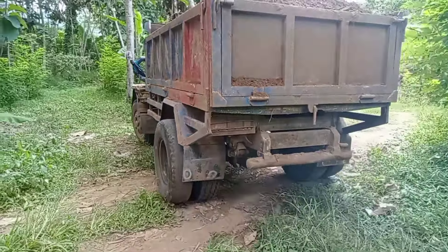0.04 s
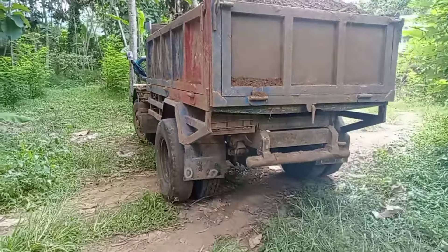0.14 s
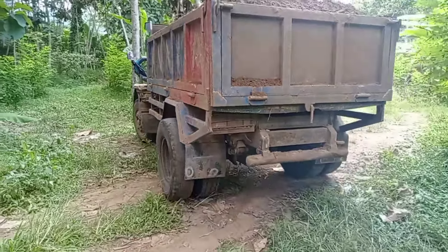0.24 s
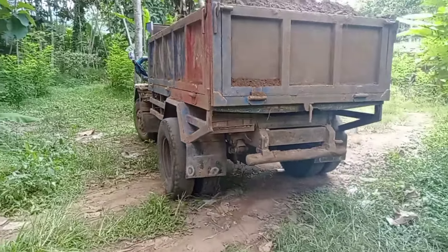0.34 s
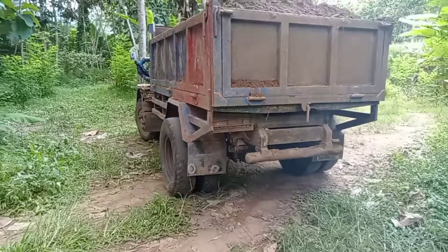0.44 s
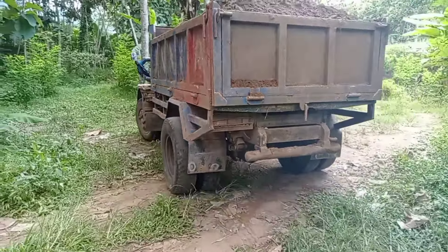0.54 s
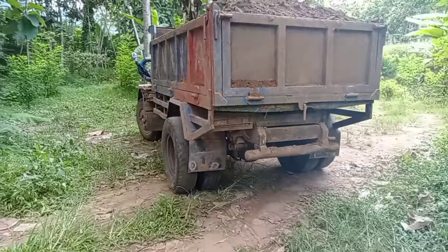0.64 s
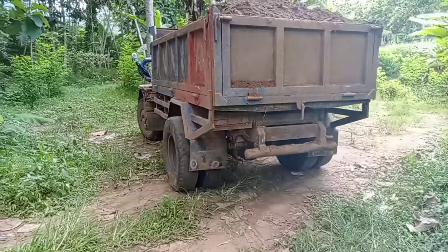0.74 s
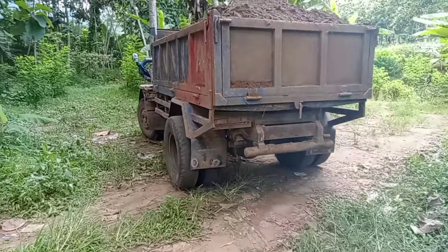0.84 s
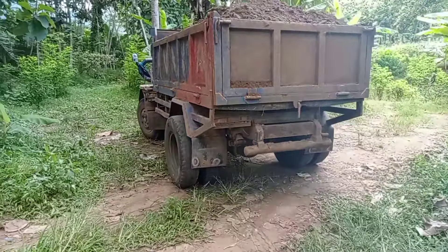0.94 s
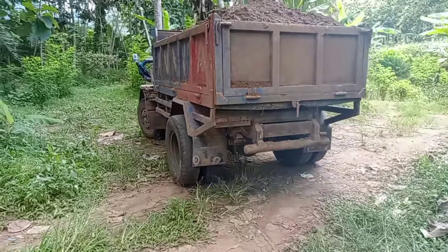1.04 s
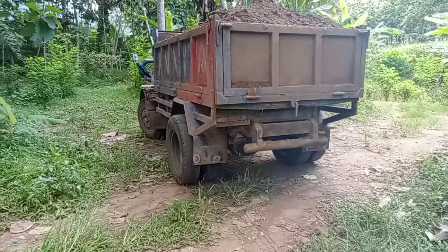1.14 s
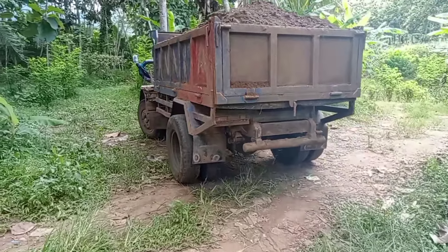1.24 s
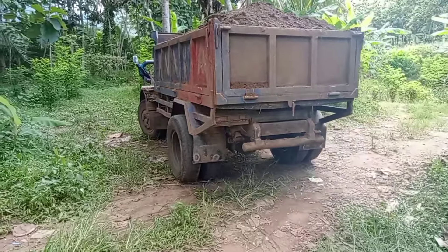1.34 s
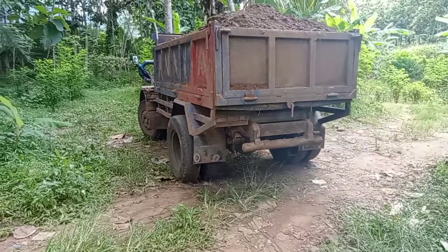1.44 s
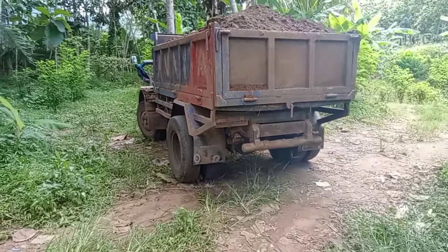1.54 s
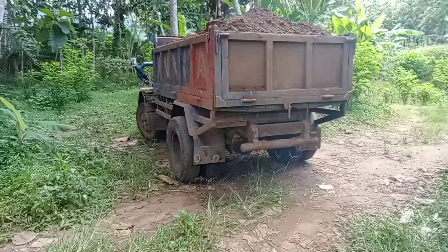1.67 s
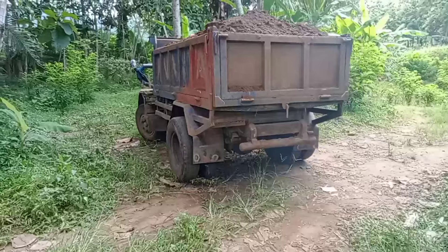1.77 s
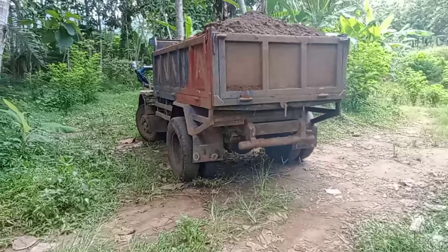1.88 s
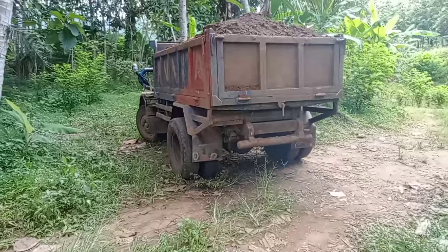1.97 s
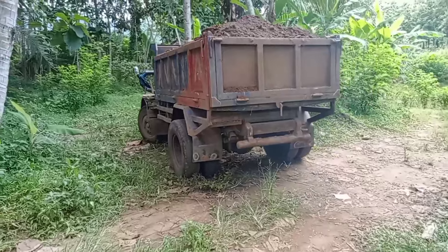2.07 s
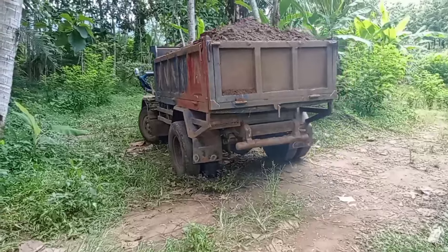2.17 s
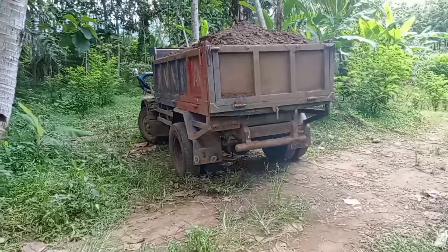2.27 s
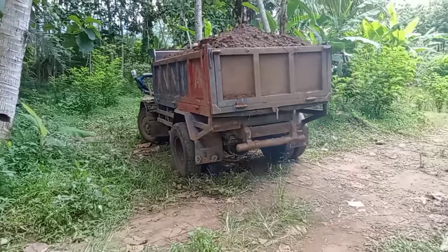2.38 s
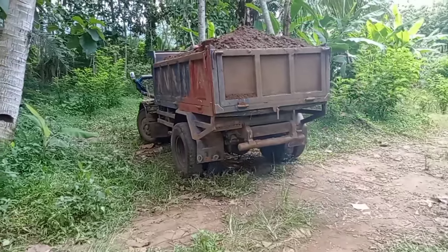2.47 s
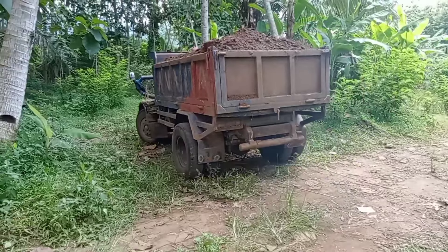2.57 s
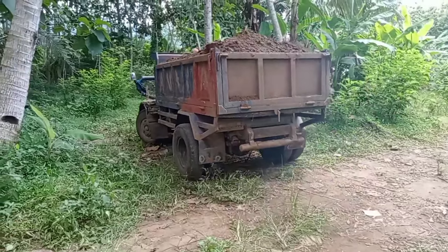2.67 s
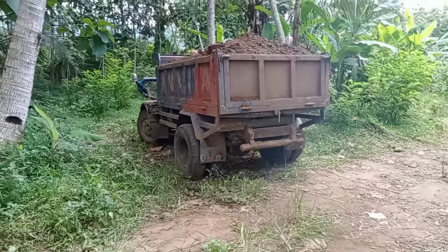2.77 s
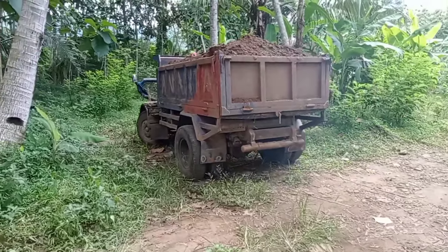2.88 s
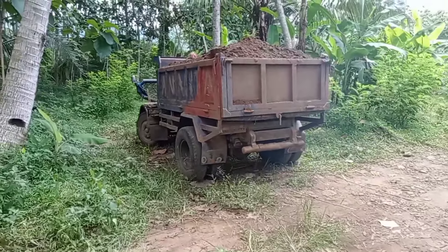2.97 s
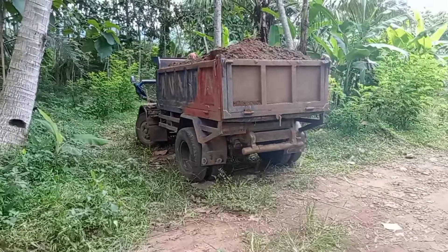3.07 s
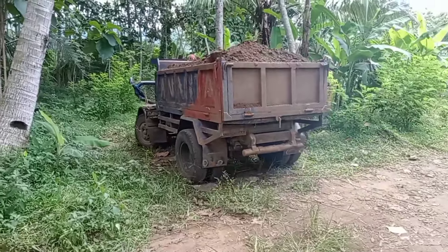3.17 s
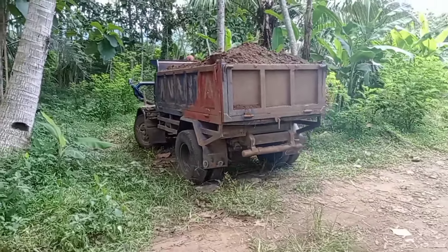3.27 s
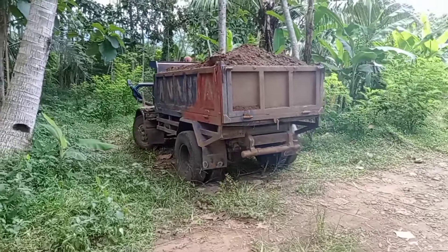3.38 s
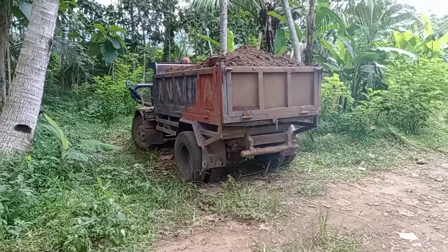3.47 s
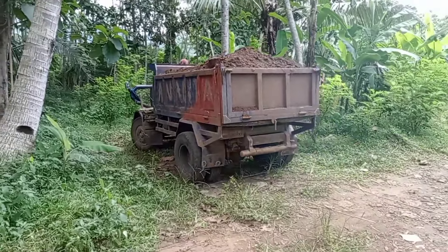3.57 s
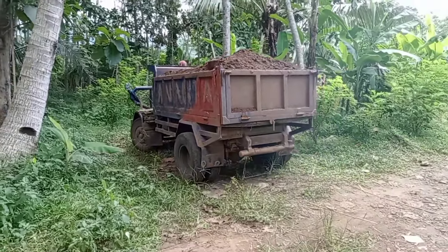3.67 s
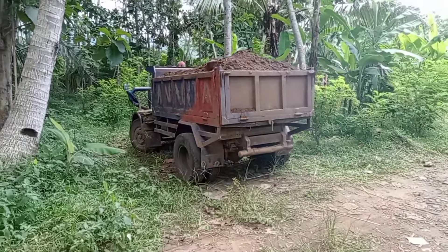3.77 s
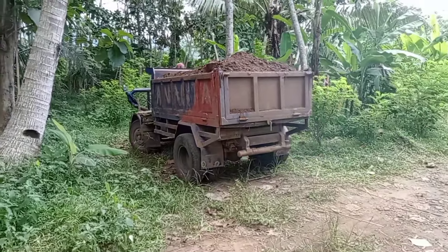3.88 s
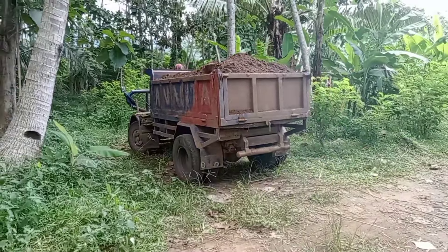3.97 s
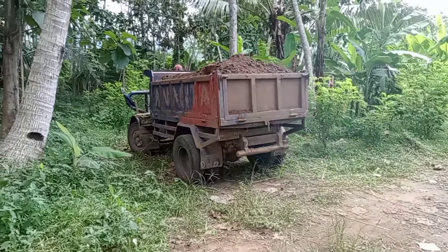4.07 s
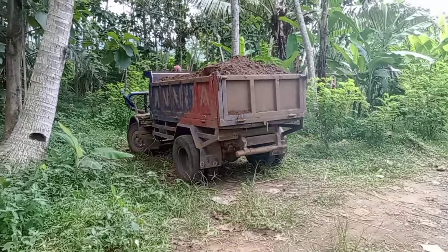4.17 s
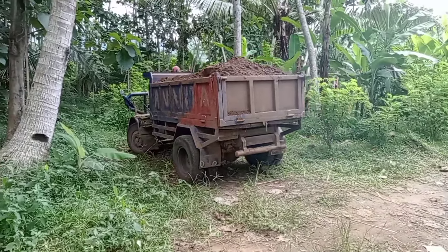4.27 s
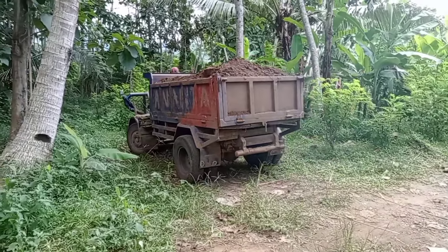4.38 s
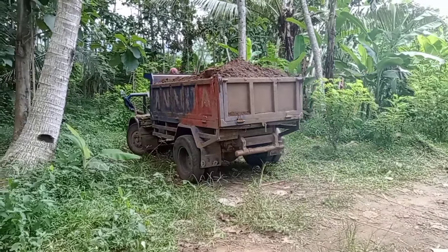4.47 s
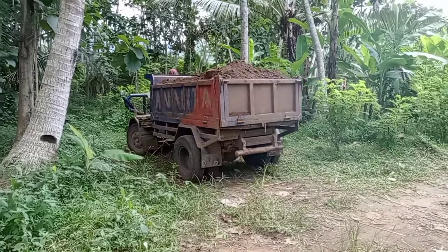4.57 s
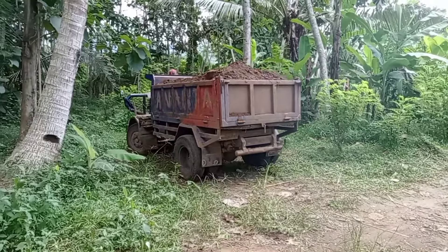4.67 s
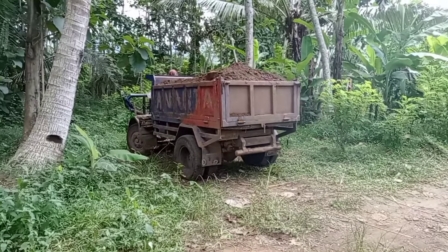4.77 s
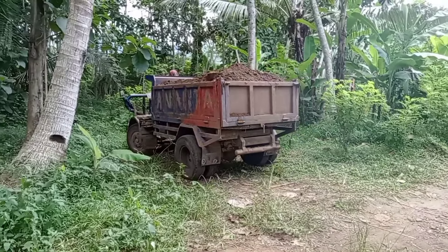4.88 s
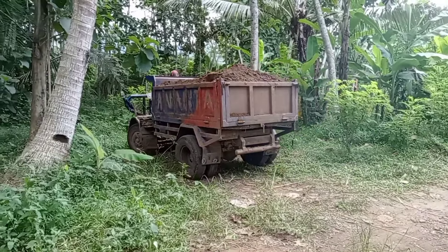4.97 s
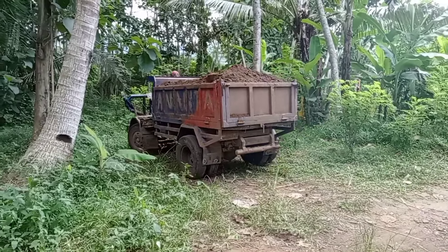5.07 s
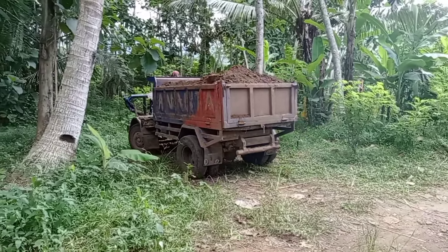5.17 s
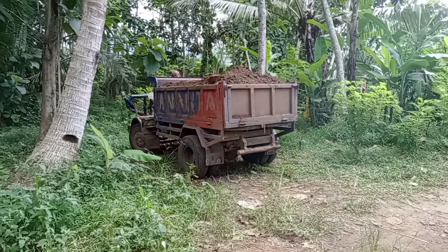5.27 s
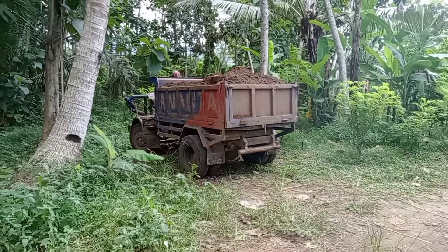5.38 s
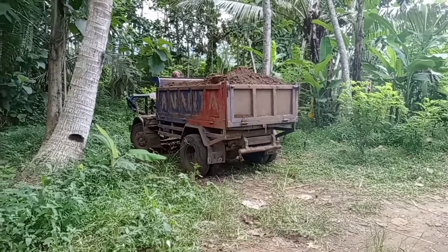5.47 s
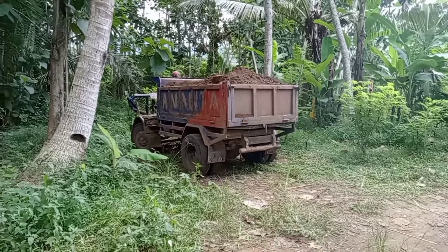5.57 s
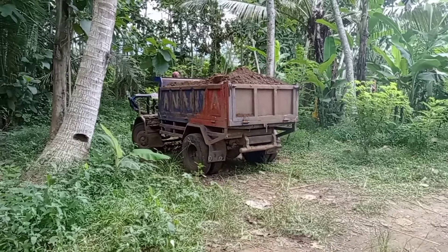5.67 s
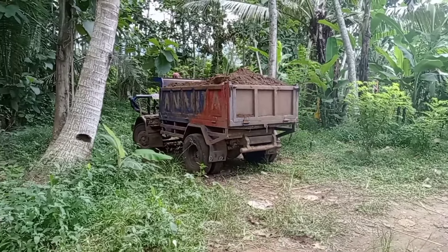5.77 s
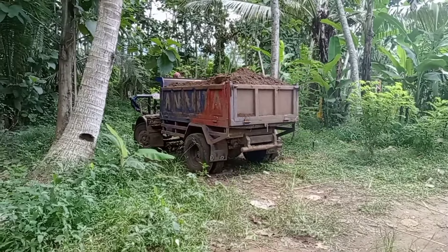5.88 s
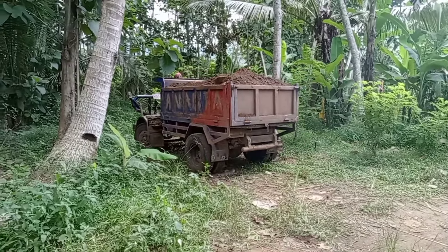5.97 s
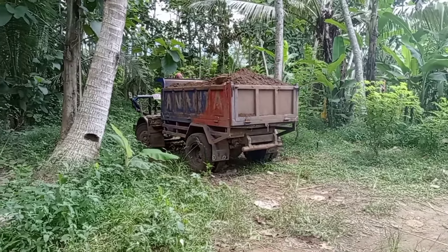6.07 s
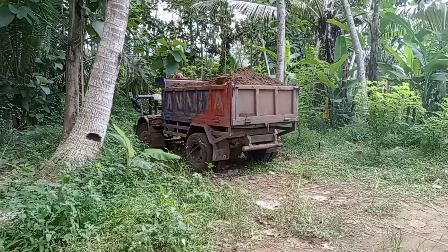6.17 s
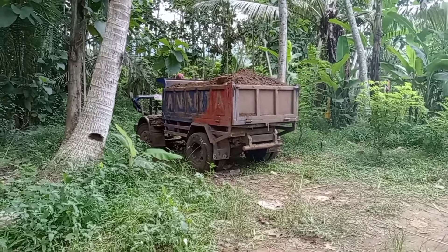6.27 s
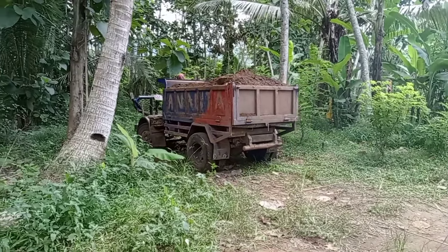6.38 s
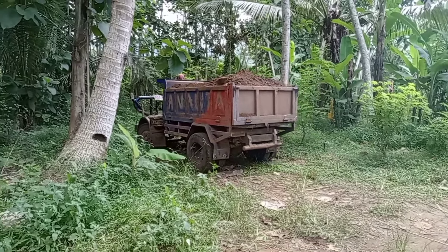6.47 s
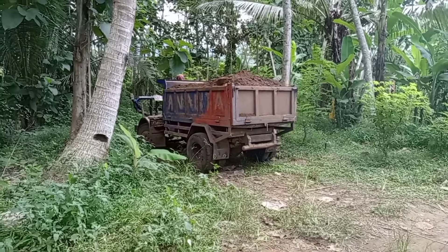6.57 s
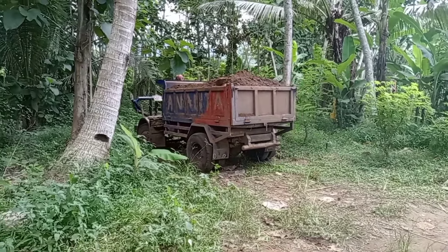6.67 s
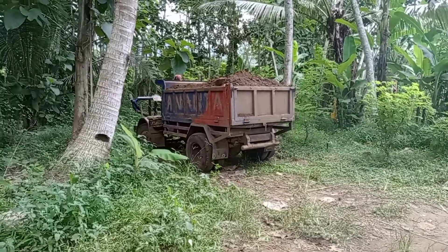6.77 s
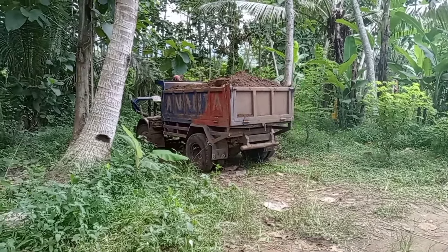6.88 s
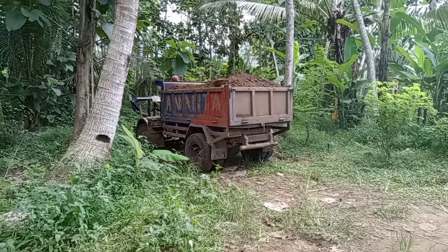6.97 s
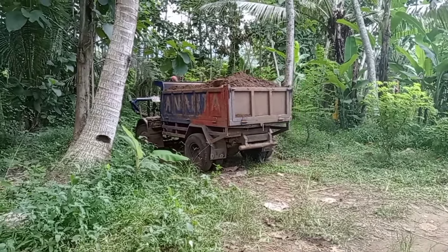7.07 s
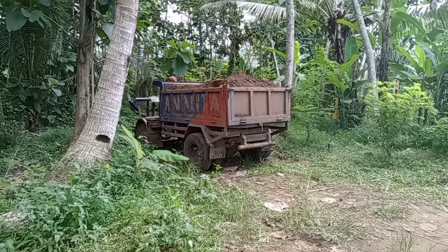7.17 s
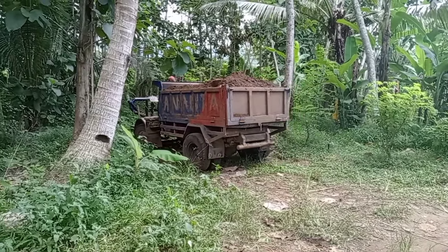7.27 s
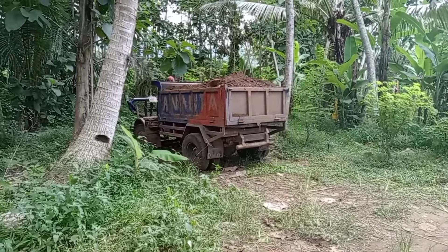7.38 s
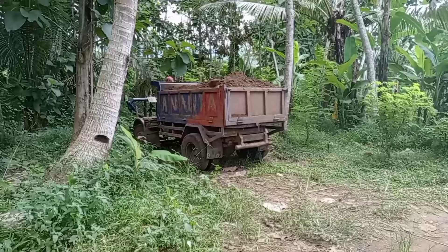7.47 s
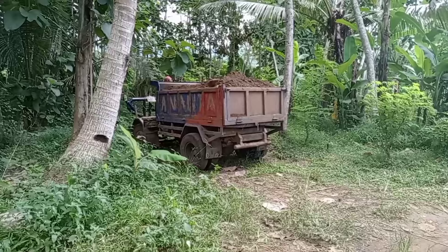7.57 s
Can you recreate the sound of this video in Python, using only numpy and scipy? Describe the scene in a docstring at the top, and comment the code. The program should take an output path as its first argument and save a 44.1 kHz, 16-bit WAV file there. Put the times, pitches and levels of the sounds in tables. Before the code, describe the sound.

A small diesel dump truck thumps away in distinct, even beats, knocking briefly, then labouring ever slower while birds whistle faintly.

```python
"""A dump truck lugging down

A loaded truck with a single-cylinder four-stroke diesel crawls away along a dirt track, slowing.
In each cycle a combustion thump, an exhaust puff and an intake gulp excite cavity resonances, while
the valve gear clatters. Hard firings knock, loose fittings clink and the tipper body clanks on ruts.
Trees reflect the sound; birds whistle and an insect buzzes faintly."""
import sys
import numpy as np
from scipy import signal
from scipy.fft import rfft, irfft
from scipy.io import wavfile
from scipy.ndimage import uniform_filter1d

SR = 44100
rng = np.random.default_rng(int(sys.argv[2]) if len(sys.argv) > 2 else 0)


def to_wav(sig):
    """Store sig (one row per channel, or 1-D mono) as 16-bit WAV at the path in sys.argv[1].

    Samples outside -1..1 are clipped; the rate is SR.
    """
    pcm = np.clip(np.atleast_2d(sig), -1, 1) * 32767
    pcm = np.round(pcm).astype(np.int16)
    wavfile.write(sys.argv[1], SR, pcm.T)  # frames by channels


N = 336924
TIME = np.arange(N) / SR


def engine():
    """Phase is the integral of frequency: returns firing rate [Hz] and crank angle [cycles]."""
    # engine speed (time [s], firing rate [Hz])
    firing_rate = [(0.0, 14.165), (0.87, 14.595), (1.54, 14.356), (2.05, 13.052), (2.61, 14.131),
                   (3.25, 14.353), (3.76, 13.527), (4.23, 12.376), (4.53, 11.838), (6.58, 9.384),
                   (6.96, 8.814), (7.64, 8.09)]
    speed = curve(firing_rate)
    return speed, np.cumsum(speed) / SR


def effort(db, speed_db, fuel_db, labour_db, lug_hz=10.4, lug_width_hz=2.83):
    """Power law of speed (speed_db per doubling), with terms for fuel and for labouring near lug_hz."""
    # governor's feed, with one burst to catch the sagging engine (time [s], fuel [share of full])
    fuel_feed = [(0, 0.82), (.35, 0.65), (.75, 0.77), (1.15, 0.48), (2.05, 0.64), (2.2, 0.98), (2.45, 1),
                 (2.68, 0.12), (7.64, 0.026)]
    speed, _ = engine()
    octaves = np.log2(speed / speed.max())
    labour = np.exp(-((speed - lug_hz) / lug_width_hz) ** 2)
    return from_db(db + speed_db * octaves + fuel_db * curve(fuel_feed) + labour_db * labour)


def stroke(crank, start, rise, uneven_db=1, jitter=0.002):
    """Quasi-periodic excitation: one uneven pressure pulse a cycle; start, rise, jitter in cycles."""
    cycle = np.floor(crank - start).astype(int) + 2
    size, late = rng.standard_normal((cycle.max() + 1, 2)).T
    age = np.maximum((crank - start) % 1 - np.abs(jitter * late[cycle]), 0) / rise
    return from_db(uneven_db * size[cycle]) * age ** 2 * np.exp(-age)


def chug(speed, crank, rumble_db=-19):
    """Cavity resonance: combustion and exhaust pulses ring crankcase and silencer; gas flow rumbles."""
    # cavity modes (frequency [Hz], bandwidth [Hz], level [dB])
    crankcase_modes = [(94.2, 62.6, 0.5), (253, 31, -13)]
    silencer_modes = [(104.1, 37.7, 2.5), (210.3, 109, -18), (129, 26.4, -3)]
    boom_mode = [(87.6, 26.7, 0)]
    # gas flow spectrum (frequency [Hz], spectral level [dB])
    flow_spectrum = [(20, -22), (40, -29), (70, -11.5), (120, -1), (190, -6.5), (280, -9), (450, -19)]
    softness = (speed.max() / speed) ** 1.18   # a slow engine lets its gas out gently: a deeper puff
    thump = stroke(crank, start=0.2628, rise=0.01 * softness)
    puff = stroke(crank, start=0.5268, rise=0.0081 * softness, uneven_db=0.4, jitter=0.001)
    boom = levelled(resonate(puff + from_db(-4) * thump, boom_mode))
    boom *= effort(-5, speed_db=-6.5, fuel_db=-4.5, labour_db=11.5)
    silencer = levelled(levelled(resonate(puff, silencer_modes)) + boom)
    crankcase = levelled(resonate(thump, crankcase_modes))
    crankcase *= effort(-14, speed_db=19, fuel_db=21, labour_db=-2)
    flow = from_db(rumble_db) * noise(flow_spectrum)
    return effort(-11, speed_db=16.5, fuel_db=-2.5, labour_db=0.5) * (crankcase - silencer + flow)


def intake(crank):
    """Air column and cavity resonance: each gulp rings the inlet pipe and the air box."""
    # intake modes (frequency [Hz], bandwidth [Hz], level [dB])
    pipe_modes = [(174.7, 21.6, 0.5), (132, 199, -10)]
    box_mode = [(332, 43, 0)]
    gulp = stroke(crank, start=0.8104, rise=0.013)
    pipe = levelled(resonate(gulp, pipe_modes))
    box = levelled(resonate(gulp, box_mode))
    return (effort(-24.5, speed_db=12.5, fuel_db=-2.5, labour_db=6.5) * pipe
            + effort(-32.5, speed_db=1.8, fuel_db=-3, labour_db=-11.5) * box)


def contacts(crank, uneven_db, play_cycles=0.004):
    """Impulse train: injector and valves click at set crank angles, scattered by mechanical play."""
    # injector and valve contacts (crank angle [cycles], level [dB])
    timing = [(.04, -0.5), (.13, -0.5), (.25, 2), (0.419, 2), (.47, 0.5), (.54, -2), (.62, 3), (.72, 1.5),
              (.8, -1), (0.879, 1)]
    taps = np.zeros(N)
    for angle, db in timing:
        size, late = np.clip(rng.standard_normal((int(crank[-1]) + 1, 2)), -2, 2).T
        at = np.searchsorted(crank, np.arange(len(size)) + angle + play_cycles * late)
        taps[at[at < N]] += from_db(db + uneven_db * size[at < N])
    return taps


def tapped(crank, modes):
    """Modal excitation: each contact strikes every mode with a strength of its own."""
    return levelled(sum(resonate(contacts(crank, uneven_db=4.5), [mode]) for mode in modes))


def clatter(crank, tick_hz=45, throb_db=2.6):
    """Structure-borne sound: valve gear rings block and covers; gears and fan hiss with the cycle."""
    # block; rocker cover and side plates (frequency [Hz], bandwidth [Hz], level [dB])
    block_modes = [(420, 60, -2), (550, 80, -2), (660, 70, -1), (745, 60, -1), (860, 80, -3), (1000, 70, 0),
                   (1240, 120, -4)]
    cover_modes = [(1790, 77, -3), (1970, 85, -2.5), (2277, 82, 0), (2484, 62, 1), (2639, 117, 0.5),
                   (2897, 50, 0), (3333, 74, 0), (3671, 85, 0)]
    # block roar; gear and fan hiss (frequency [Hz], spectral level [dB])
    roar_spectrum = [(150, -9.5), (350, 0.5), (480, -3.5), (720, -11), (880, -7), (1020, -3.5), (1130, -3),
                     (1280, -12.5), (1500, -9.5), (2200, -17)]
    hiss_spectrum = [(1400, -21.5), (1650, -6), (1950, 0), (2250, -0.5), (2700, -1.5), (3150, 0),
                     (3600, -1), (4100, -4.5), (4800, -22.5), (7200, -24), (8800, -15), (10500, -21),
                     (13000, -22), (15500, -23)]
    ticks = rms_one(lowpass(contacts(crank, uneven_db=1) + 1e-18, tick_hz))
    throb = from_db(throb_db * np.cos(2 * np.pi * (crank - 0.27)))   # loudest at combustion
    block = from_db(-4) * tapped(crank, block_modes) + from_db(-6) * throb * noise(roar_spectrum)
    hiss = np.hypot(from_db(-8) * ticks, from_db(-6) * throb) * noise(hiss_spectrum)
    covers = from_db(-5) * tapped(crank, cover_modes)
    return (effort(-34.5, speed_db=3.5, fuel_db=4, labour_db=0) * block
            + effort(-37, speed_db=5, fuel_db=-0.5, labour_db=-0.3) * (hiss + covers))


def blows(events, gain_db, crack_s, tail_s, tail_db, steel_db, thud_hz, thud_db, thud_s):
    """Impact response of steel: a crack, a tail of dense modes, a few damped rings and a low thud."""
    # overlapping modes (frequency [Hz], spectral level [dB])
    crack_spectrum = [(250, 3), (700, 9.5), (1200, 2.5), (1700, -8), (2400, 0), (3000, 5), (3700, 2),
                      (4300, -11), (5200, -30), (7000, -22.5), (8700, -10), (10500, -19), (15500, -34)]
    # distinct modes (frequency [Hz], bandwidth [Hz], level [dB])
    steel_modes = [(1274, 27, 4.5), (2727, 41, 2), (2920, 30, 3), (3490, 45, 2), (3505, 44, 3),
                   (8160, 250, -16)]
    dense = noise(crack_spectrum)
    treble = highpass(dense, 5500)
    out = np.zeros(N)
    for start, db, treble_db in events:
        span = slice(int(start * SR), int(start * SR) + SR // 3)
        age = TIME[span] - TIME[span][0]
        decay = np.exp(-age / crack_s) + from_db(tail_db) * np.exp(-age / tail_s)
        crack = decay * (dense[span] + (from_db(treble_db) - 1) * treble[span])
        rings = 0
        for hz, width_hz, mode_db in steel_modes:
            strength = from_db(mode_db + rng.normal(0, 1.9)) * rng.choice([-1, 1])
            rings += strength * np.exp(-np.pi * width_hz * age) * np.sin(2 * np.pi * hz * age)
        thud = -age / thud_s * np.exp(1 - age / thud_s) * np.sin(2 * np.pi * thud_hz * age)
        out[span] += from_db(db + gain_db) * (crack + from_db(steel_db) * rings + from_db(thud_db) * thud)
    return out


def knocks():
    """Impulsive excitation: hard firings strike the engine's steel, hardest on full fuel."""
    # hard firings (time [s], relative level [dB], treble gain [dB])
    firings = [(0.018, -30, -4), (0.088, -27.5, 1.5), (0.159, -30.5, 9), (0.2274, -31, -8),
               (0.3675, -31, -8.5), (0.714, -26.5, -8), (2.129, -26, -15), (2.206, -19, 0.5),
               (2.281, -20.5, 1.5), (2.355, -20.5, 6.5), (2.4306, -21, -8), (2.4997, -33, -14)]
    return blows(firings, gain_db=-4, crack_s=0.0059, tail_s=0.055, tail_db=-4.5, steel_db=-8.5,
                 thud_hz=214, thud_db=10.5, thud_s=0.0039)


def clanks():
    """Free vibration: the tipper body rings after a jolt from a rut."""
    # jolts (time [s], relative level [dB], treble gain [dB])
    jolts = [(4.835, -26.5, 5), (7.203, -40.5, 8)]
    return blows(jolts, gain_db=-7, crack_s=0.008, tail_s=0.035, tail_db=-6, steel_db=-9,
                 thud_hz=460, thud_db=0, thud_s=0.012)


def whine(crank, meshes_per_cycle=50.2, wobble_rad=0.73):
    """Phase modulation: backlash unsettles the faint tone of meshing gear teeth."""
    wobble = wobble_rad * noise([(4, -11), (40, -8)])
    tone = rms_one(np.sin(2 * np.pi * meshes_per_cycle * crank + wobble))
    return effort(-49, speed_db=10, fuel_db=4.5, labour_db=0.5) * tone


def fittings(speed, clinks_per_s=18, low_hz=2239, high_hz=3106, decay_s=0.015):
    """Damped oscillation: loose latches and chains clink at random in two modes, harder at speed."""
    out, age = np.zeros(N + SR), np.arange(SR // 10) / SR
    for when, size, *pitches in rng.random((int(clinks_per_s * N / SR), 4)):
        at = int(when * N)
        rings = sum(np.sin(2 * np.pi * low_hz * (high_hz / low_hz) ** p * age) for p in pitches)
        strength = from_db(-38 + 2 * min(-np.log(size), 2)) * (speed[at] / speed.max()) ** 2
        out[at:at + len(age)] += strength * rings * np.exp(-age / decay_s)
    return out[:N]


def nearness(crank, start_m=7.27, m_per_cycle=0.053):
    """Spherical spreading: pressure falls as 1 / distance while the truck moves off in one gear."""
    return start_m / (start_m + m_per_cycle * crank)


def trees(x, echo_db=-17, dull_hz=1500):
    """Reflection: trunks and tipper body add three dull copies whose paths change as the truck moves."""
    # reflection paths (initial delay [s], drift [s/s])
    paths = [(0.021, -0.021), (0.047, -0.0061), (0.083, -0.012)]
    dull = lowpass(x, dull_hz)
    echoes = sum(np.interp(TIME - lag - drift * TIME, TIME, dull, left=0) for lag, drift in paths)
    return x + from_db(echo_db) * echoes / np.sqrt(3)


def birds(gain_db=-5, waver_hz=85, flutter_db=3):
    """Random frequency and amplitude modulation: thin whistles arrive ragged through the leaves."""
    # whistles (time [s], duration [s], pitch [Hz], glide [Hz], relative level [dB])
    notes = [(0.254, 0.27, 4125, 9, -40), (1.292, 0.19, 4180, 0, -46), (3.229, 0.35, 4100, 0, -48),
             (5.9, 0.072, 5330, 0, -61), (6.434, .17, 5300, -2, -59), (7.347, 0.12, 4050, 550, -52),
             (7.48, 0.16, 4160, 5.5, -53), (7.563, 0.077, 4800, 400, -62)]
    waver = waver_hz * noise([(30, -8), (200, -6)])
    flutter = from_db(flutter_db * noise([(10, 21), (60, -18)]))
    out = np.zeros(N)
    for start, length, hz, glide_hz, db in notes:
        span, progress, shape = swell(start, length)
        pitch = hz + glide_hz * progress + waver[span]
        tone = np.sin(2 * np.pi * np.cumsum(pitch) / SR)
        out[span] += from_db(db + gain_db) * shape * flutter[span] * tone
    return out


def insect():
    """Narrow-band noise: an insect in the grass buzzes in short, high bursts."""
    # buzzes (time [s], duration [s], level [dB])
    bursts = [(.24, .2, -61), (.8, 0.22, -61), (1.254, 0.42, -67), (1.998, 0.27, -62), (3.15, 0.38, -63),
              (7.369, 0.22, -73)]
    # band of the buzz (frequency [Hz], bandwidth [Hz], level [dB])
    buzz_band = [(11630, 180, 0)]
    buzz = rms_one(resonate(rng.standard_normal(N), buzz_band))
    out = np.zeros(N)
    for start, length, db in bursts:
        span, _, shape = swell(start, length)
        out[span] += from_db(db) * shape * buzz[span]
    return out


def swell(start, length):
    """Amplitude envelope: a note's samples, its progress from 0 to 1 and its rounded rise and fall."""
    span = np.arange(int(start * SR), min(int((start + length) * SR), N))
    progress = np.linspace(0, 1, len(span))
    return span, progress, np.sqrt(np.abs(np.sin(np.pi * progress)))


def resonate(x, modes):
    """Modal superposition: one band-pass filter a mode, summed."""
    out = 0
    for hz, width_hz, db in modes:
        low = np.hypot(hz, width_hz / 2) - width_hz / 2
        band = signal.butter(2, [low, low + width_hz], "band", fs=SR, output="sos")
        out += from_db(db) * signal.sosfilt(band, x + 1e-18)
    return out


def noise(spectrum):
    """Spectral shaping: noise of rms 1 from rows of (frequency [Hz], spectral level [dB])."""
    hz, db = np.transpose(spectrum)
    f = np.maximum(np.fft.rfftfreq(N, 1 / SR), 1)
    colour = from_db(np.interp(np.log(f), np.log(hz), db))
    skirts = np.minimum(f / hz[0], 1) ** 2 * np.minimum(hz[-1] / f, 1) ** 2
    return rms_one(irfft(rfft(rng.standard_normal(N)) * skirts * colour, N))


def lowpass(x, hz):
    """First-order treble roll-off."""
    return signal.sosfilt(signal.butter(1, hz, fs=SR, output="sos"), x)


def highpass(x, hz):
    """Zero-phase bass roll-off."""
    return signal.sosfiltfilt(signal.butter(2, hz, "high", fs=SR, output="sos"), x)


def levelled(x):
    """Running normalisation: power is held steady over a few cycles, leaving the throb."""
    power = uniform_filter1d(uniform_filter1d(x ** 2, size=SR // 3), size=SR // 4)
    return x / np.sqrt(power + 1e-20)


def curve(rows):
    """Linear interpolation of (time [s], value) at every sample."""
    return np.interp(TIME, *np.transpose(rows))


def rms_one(x):
    """Normalisation to rms 1."""
    return x / np.sqrt(np.mean(x ** 2) + 1e-20)


def from_db(db):
    """Decibels to amplitude ratio."""
    return 10 ** (np.asarray(db) / 20)


def scene():
    """Superposition: the receding truck, its reflections and the wildlife add up."""
    speed, crank = engine()
    running = chug(speed, crank) + intake(crank) + clatter(crank) + whine(crank) + fittings(speed)
    truck = nearness(crank) * running + knocks() + clanks()
    return (trees(truck) + birds() + insect())[None]


def record(dry, low_cut_hz=72.3, high_cut_hz=15700):
    """Band limiting: a small microphone cuts bass and top; a faint deep rumble follows the engine."""
    _, crank = engine()
    rumble_gain = nearness(crank) * effort(-47, speed_db=3, fuel_db=8, labour_db=-2)
    rumble = rumble_gain * noise([(18, 4), (45, -23), (70, -3)])
    steep_cut = signal.ellip(10, 0.1, 80, high_cut_hz, fs=SR, output="sos")
    return signal.sosfilt(steep_cut, highpass(dry, low_cut_hz) + rumble)


dry = scene()
out = record(dry)
to_wav(out)
```